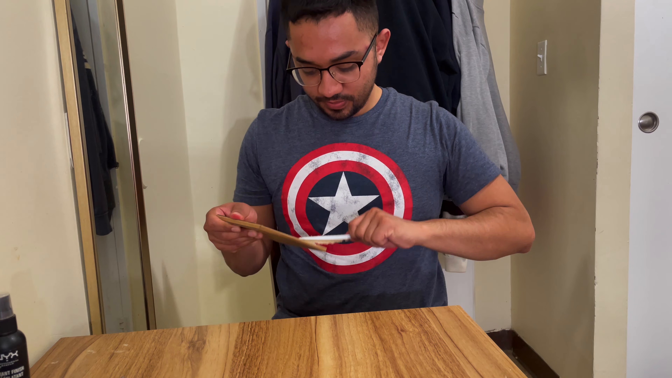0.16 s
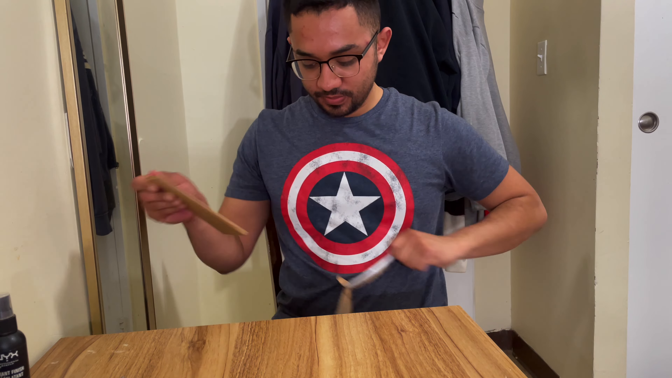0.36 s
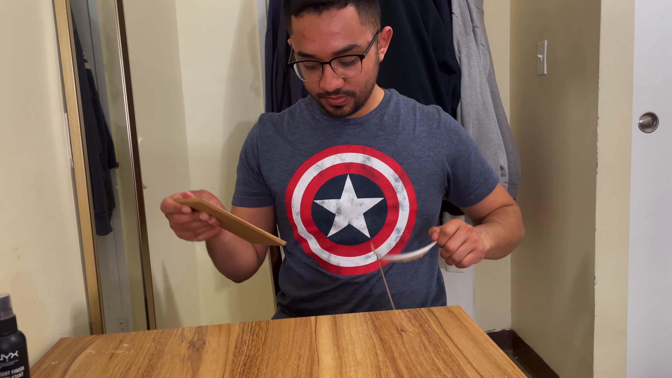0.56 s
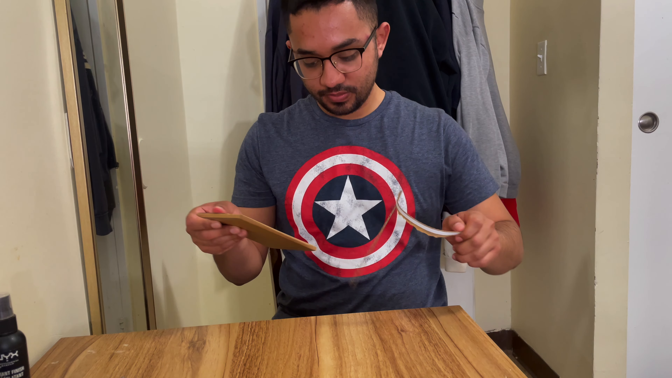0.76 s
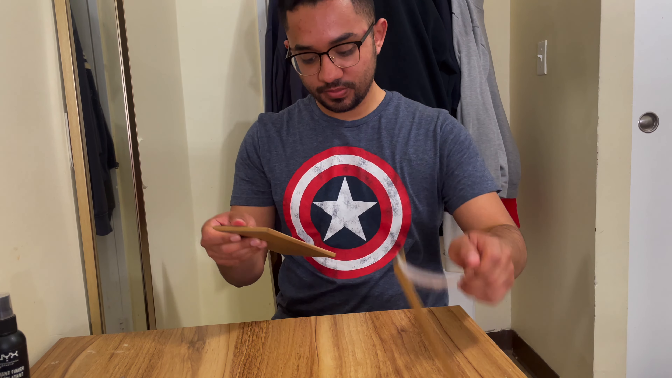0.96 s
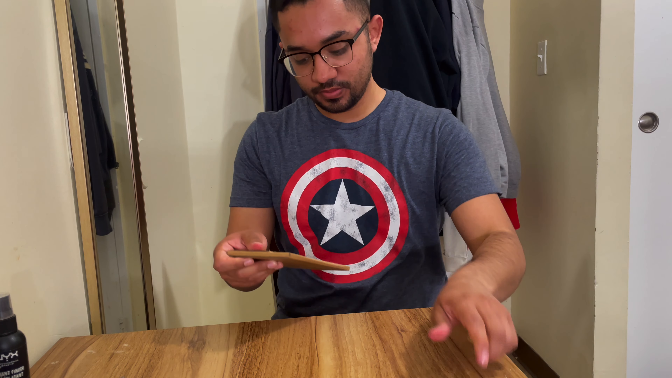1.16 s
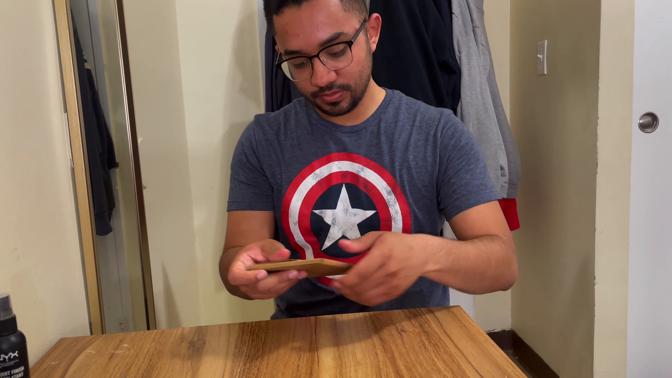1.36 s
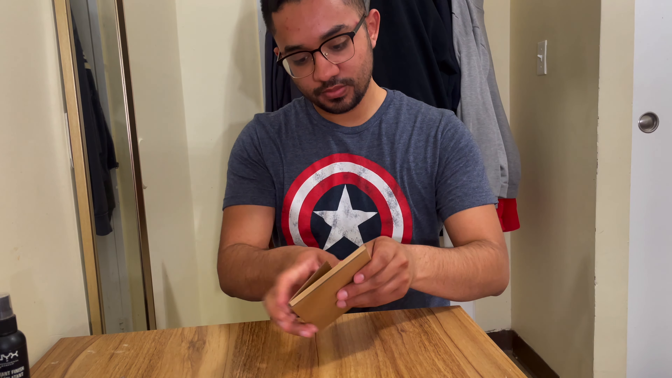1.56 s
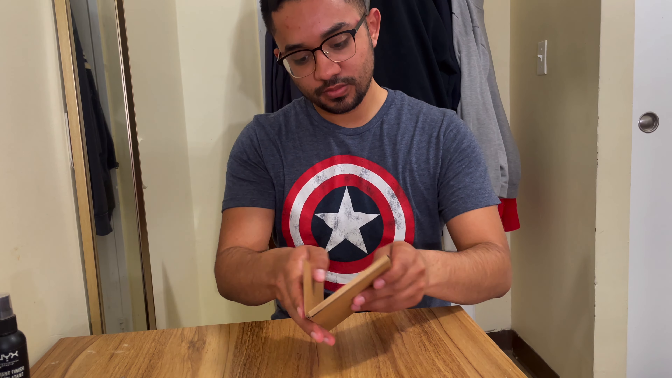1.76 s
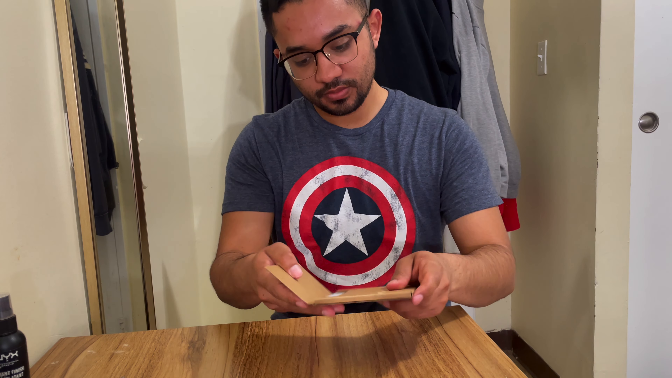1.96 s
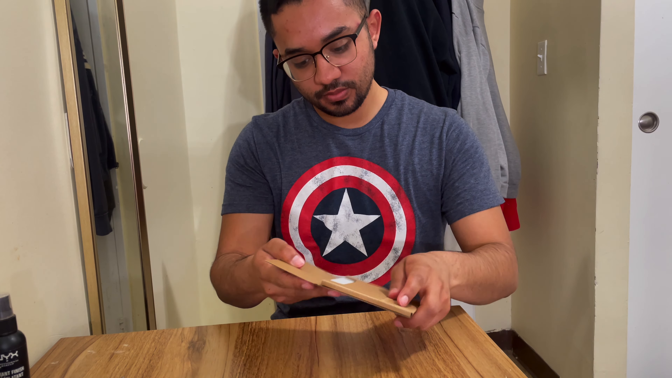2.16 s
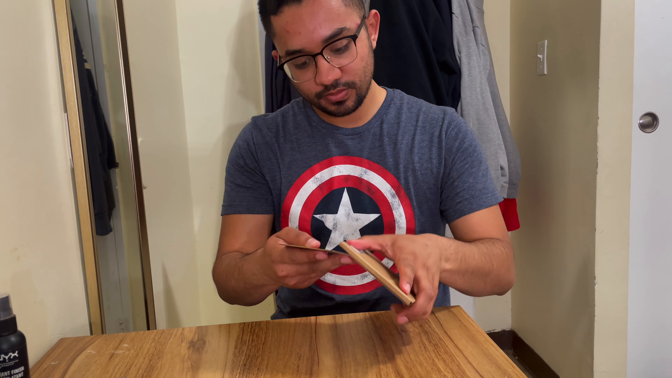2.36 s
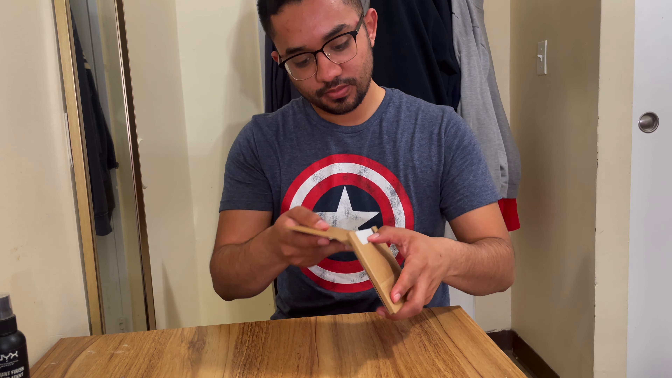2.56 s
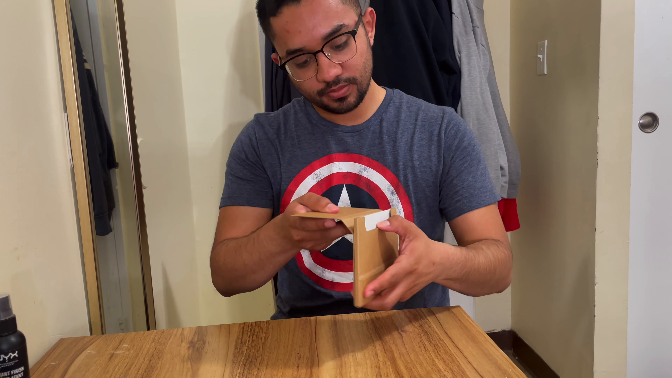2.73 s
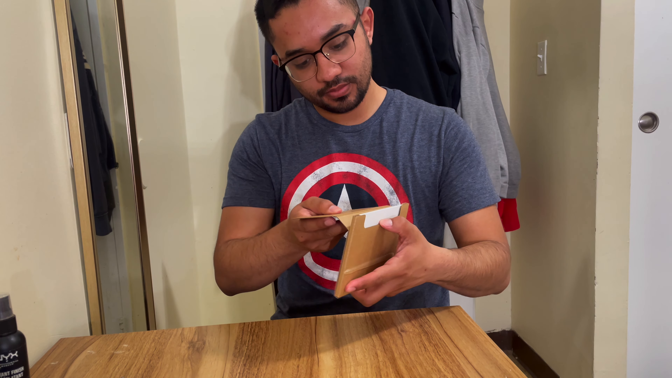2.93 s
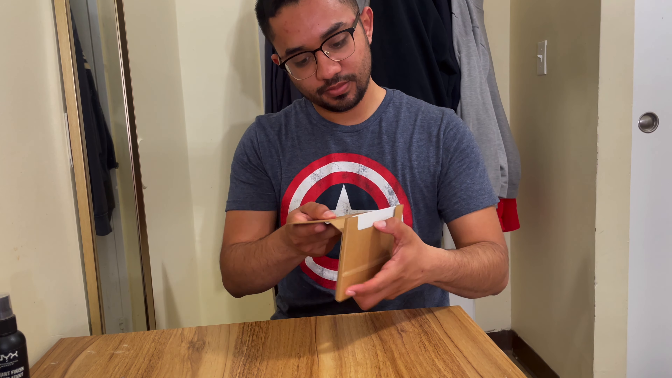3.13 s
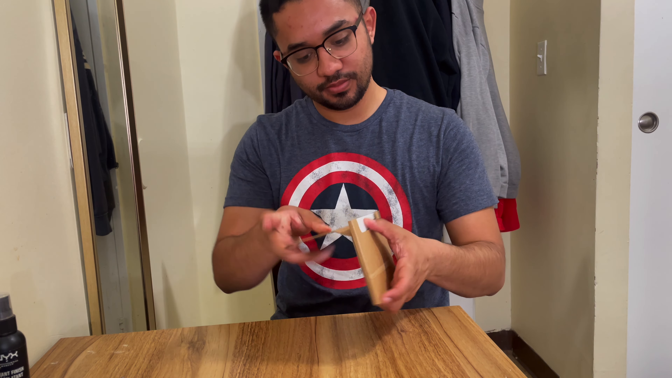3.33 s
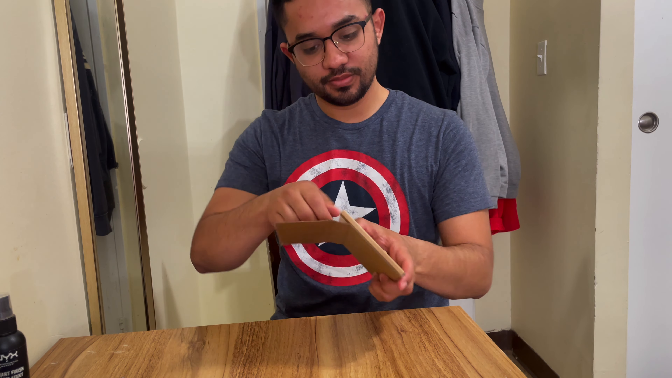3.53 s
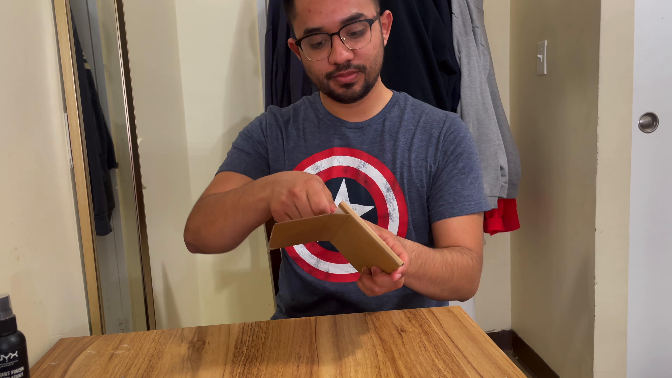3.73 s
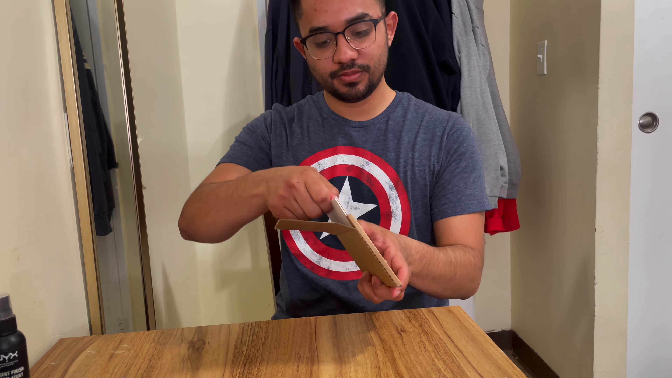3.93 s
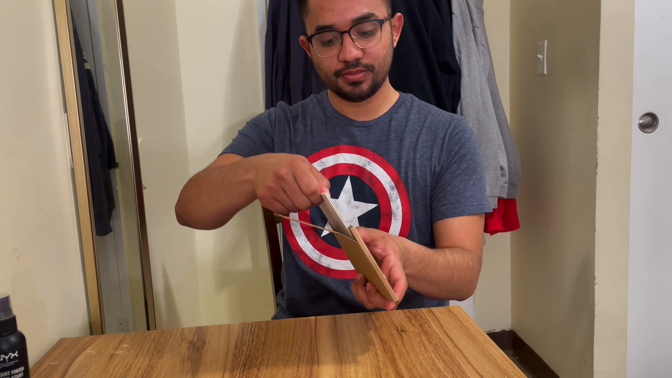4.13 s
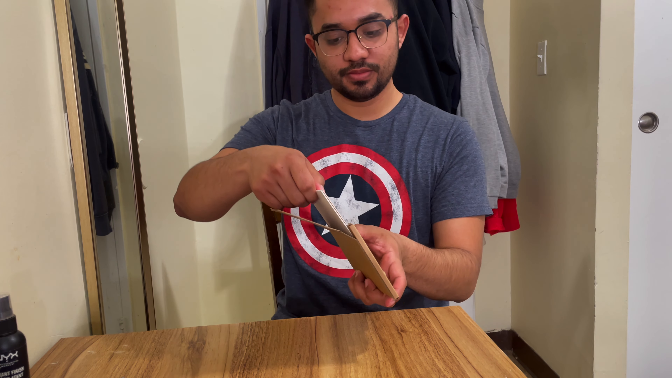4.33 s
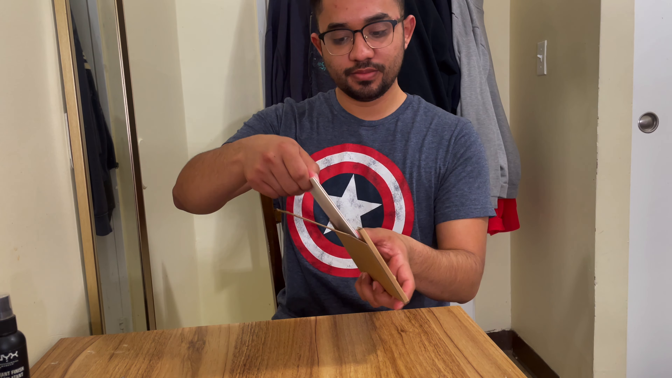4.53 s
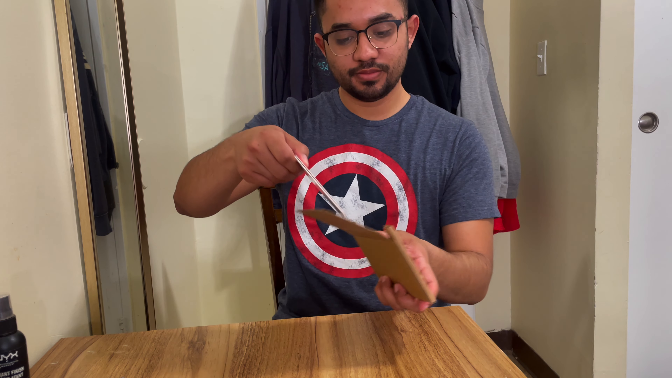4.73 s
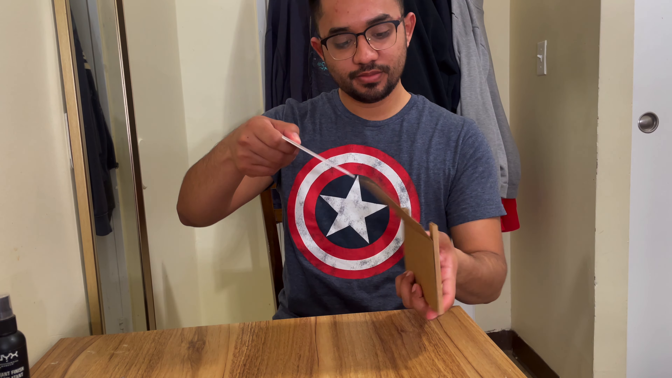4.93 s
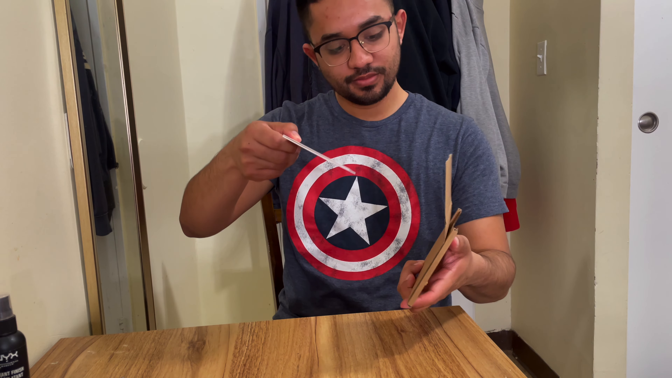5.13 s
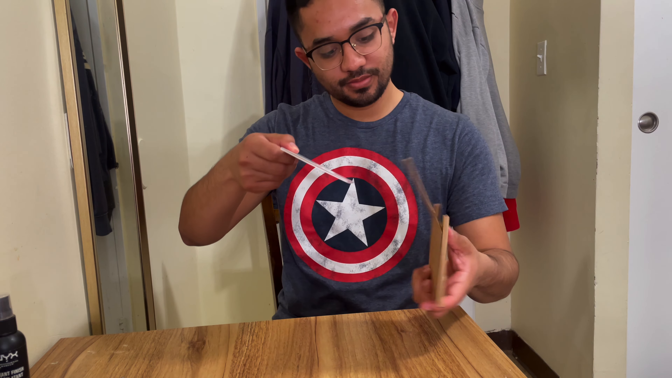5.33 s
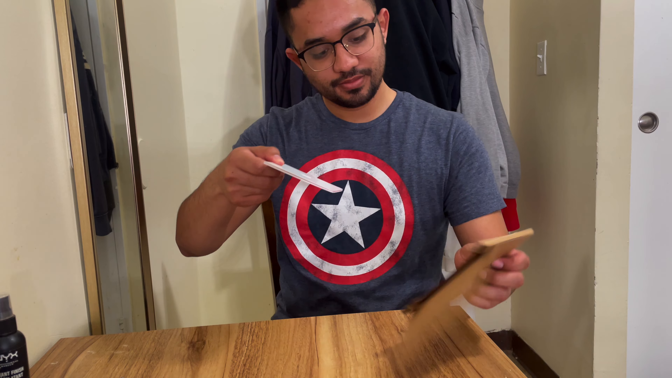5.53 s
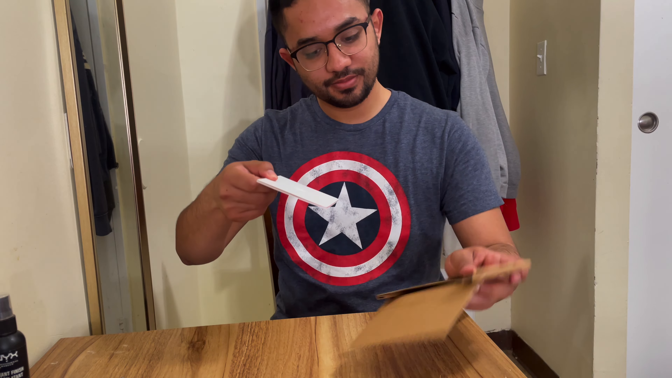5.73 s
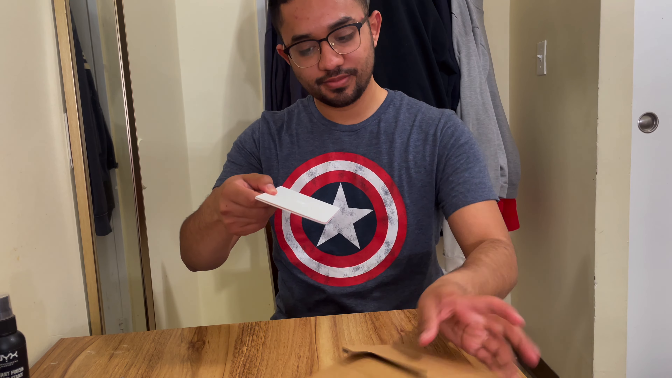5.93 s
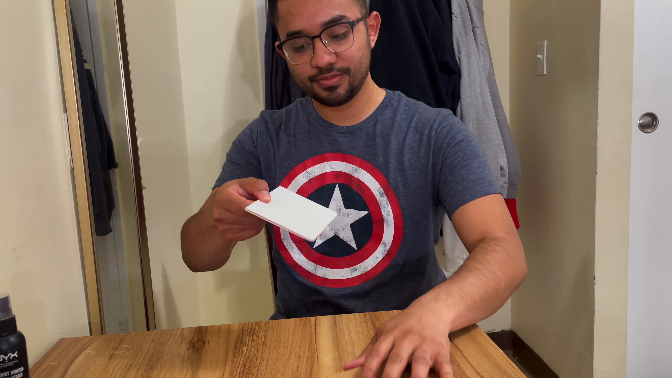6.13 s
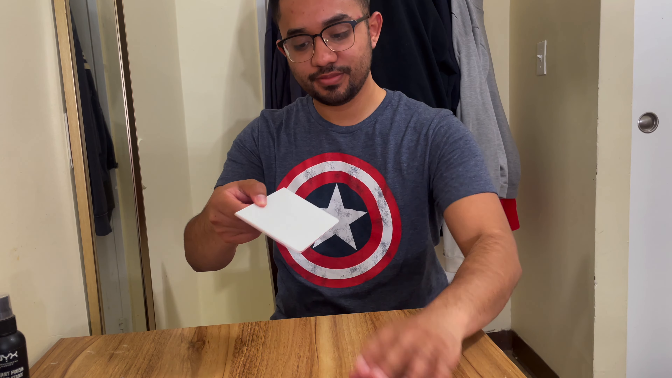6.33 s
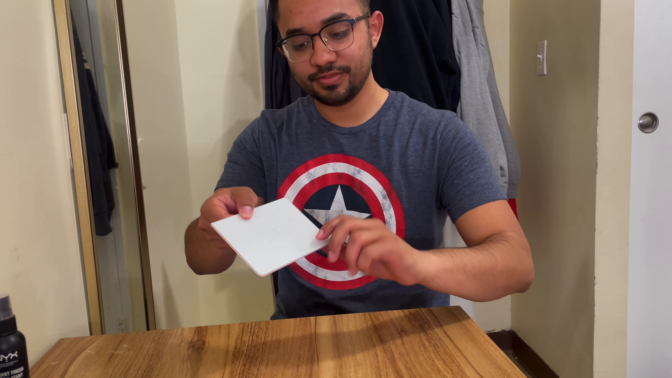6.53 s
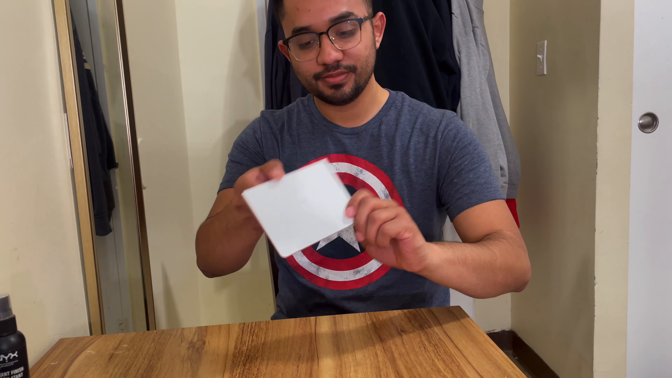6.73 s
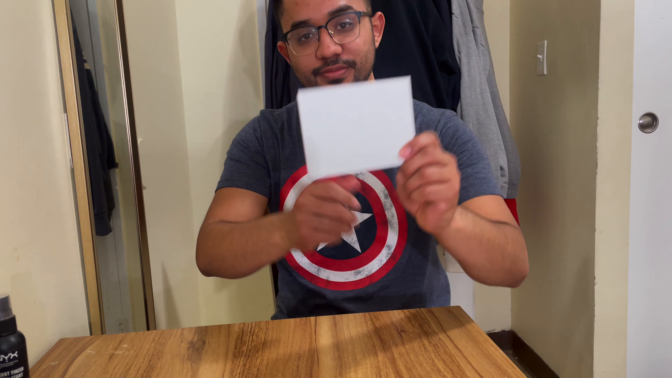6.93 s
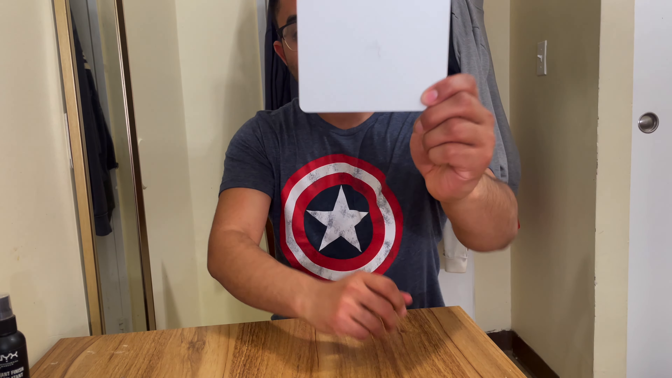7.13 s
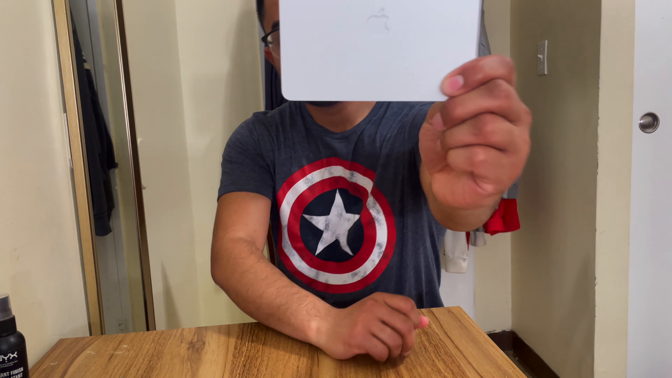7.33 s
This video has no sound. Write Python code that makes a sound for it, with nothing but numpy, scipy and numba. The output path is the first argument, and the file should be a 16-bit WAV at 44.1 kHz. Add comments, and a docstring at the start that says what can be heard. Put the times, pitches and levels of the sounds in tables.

```python
"""A thin cardboard sleeve is torn open and handled: hands rip off its strip, drop it, fumble the flaps,
slide a card out and lay the sleeve on a wooden table. Fibres snap and tear, fingers rub, and both
drive the broad modes of the sheet. Contacts thump the low modes of the table top.
A phone listens in a small room, with the low murmur of the house behind."""
import sys
import numpy as np
from scipy import signal
from scipy.fft import rfft, irfft, next_fast_len
from scipy.io import wavfile
from scipy.ndimage import uniform_filter1d
from numba import njit

SR = 44100
rng = np.random.default_rng(int(sys.argv[2]) if len(sys.argv) > 2 else 0)


def unload_wav(signal):
    """Save mono or channel-first audio to the path in sys.argv[1] as 16-bit WAV at rate SR, clipped to [-1, 1]."""
    wavfile.write(
        sys.argv[1],
        SR,
        np.round(np.clip(np.atleast_2d(signal).T, -1, 1) * 32767).astype(np.int16),
    )


N = 325448


def undb(db):
    """Decibels to gain."""
    return 10 ** (np.asarray(db) / 20)


def unit_rms(x):
    """Scale to rms 1."""
    return x / np.sqrt(np.mean(x ** 2))


def wander(rate_hz):
    """Random steps, smoothed twice; rms 1."""
    hold = int(SR / rate_hz)
    steps = np.repeat(rng.standard_normal(N // hold + 1), hold)
    return unit_rms(uniform_filter1d(uniform_filter1d(steps, hold), hold)[:N])


@njit
def bandpass(x, centre_hz, width_hz):
    """State-variable band-pass, unity gain at a moving centre."""
    y, band, low = np.empty(len(x)), 0., 0.
    for i in range(len(x)):
        g, damping = np.tan(np.pi * centre_hz[i] / SR), width_hz / centre_hz[i]
        v = (band + g * (x[i] + 1e-18 - low)) / (1 + g * (g + damping))
        band, low, y[i] = 2 * v - band, low + 2 * g * v, damping * v
    return y


# Murmur spectrum: freq_hz, relative_density_db
MURMUR_SPECTRUM = [(25, -26.5), (50, -1.5), (100, -2.5), (160, -7), (300, -13.5), (550, -29.5),
                   (1200, -35.5), (3500, -42.5), (8000, -45.5), (15000, -51.5)]
# Murmur envelope: time_s, level_db
MURMUR_LEVELS = [(0, -50.5), (.4, -60), (2.4, -62), (3.3, -60), (4.2, -63), (5.3, -62), (6.3, -55),
                 (7, -64.5), (7.38, -58.5)]


def house_murmur(flicker_db=1.9, side_gain=0.39):
    """Low noise in octave bands that swell together and flicker alone."""
    freq_hz = np.arange(N // 2 + 1) * SR / N + 1
    at_hz, density_db = np.transpose(MURMUR_SPECTRUM)
    colour = undb(np.interp(np.log(freq_hz), np.log(at_hz), density_db))
    mid, side = rfft(rng.standard_normal((2, N))) * colour
    stereo = np.array([mid + side_gain * side, mid - side_gain * side])
    murmur = np.zeros((2, N))
    for octave in range(10):
        band = np.clip(1 - abs(np.log2(freq_hz / 30) - octave), 0, 1)
        murmur += undb(flicker_db * wander(3.4)) * irfft(band * stereo, N)
    level_db = np.interp(np.arange(N) / SR, *np.transpose(MURMUR_LEVELS))
    return unit_rms(murmur) * undb(level_db)


# Room decay: freq_hz, t60_s
ROOM_DECAY = [(150, 0.79), (500, 0.16), (1500, 0.36), (4000, 0.29), (10000, 0.15)]


def echo_tails(count, gap_ms=1.6):
    """Dense stereo echoes, one pattern per hand position; each octave has its own decay."""
    t = np.arange(SR // 2) / SR
    at_hz, t60s = np.transpose(ROOM_DECAY)
    tails = np.zeros((count, 2, len(t)))
    for hz in 180 * 2. ** np.arange(7):
        band = signal.butter(2, [hz / np.sqrt(2), hz * np.sqrt(2)], "band", fs=SR, output="sos")
        t60_s = np.interp(np.log(hz), np.log(at_hz), t60s)
        tails += signal.sosfilt(band, rng.standard_normal(tails.shape)) * 1000. ** (-t / t60_s)
    tails *= t > gap_ms / 1000
    return tails / np.sqrt(np.mean(np.sum(tails ** 2, axis=2)))


def room(direct, wet_db=-6.5):
    """The hands keep moving, so one echo pattern fades into the next every half second."""
    hop = SR // 2
    wet, padded = np.zeros((2, N + 5 * hop)), np.pad(direct, (hop, 2 * hop))
    window = np.sin(np.pi * np.arange(2 * hop) / (2 * hop))
    for k, tail in enumerate(echo_tails(count=N // hop + 2)):
        piece = padded[k * hop:(k + 2) * hop] * window
        wet[:, k * hop:(k + 3) * hop - 1] += signal.fftconvolve(piece[None], tail, axes=1)
    return direct + undb(wet_db) * wet[:, hop:hop + N]


# Pushes on the table top: start_s, level_db, upper_modes_rel_db
TABLE_PUSHES = [(0.034, -25.5, -3), (0.207, -30.5, 7), (0.506, -38, -1.5), (0.602, -42, 1.5),
                (0.966, -32.5, -5), (1.069, -18, -12), (3.467, -46, 8), (3.529, -47, 10.5),
                (4.886, -39.5, 9.5), (5.864, -38.5, -10.5), (5.925, -27.5, -4.5), (5.965, -16, -17),
                (5.991, -25.5, -19), (6.222, -36, -9), (6.459, -53, -18), (7.233, -45, -3)]
# Table top modes, three lower then three upper: pitch_hz, gain_db, t60_s
TABLE_MODES = [(102, -1, .24), (125, -2, .2), (150, 0, .24), (215, 0, .12), (285, 0, .12), (350, -2, .1)]


def table_thumps(contact_ms=1.5, rise_s=0.0031):
    """Half-sine pushes ring the wooden top; little of the thump sounds below its modes."""
    n = int(contact_ms * SR / 1000)
    pulse = np.sin(np.pi * np.arange(n) / n) / n
    pushes = np.zeros((2, N))
    for start_s, level_db, upper_db in TABLE_PUSHES:
        i = int(start_s * SR)
        pushes[:, i:i + n] += np.outer(undb([level_db, level_db + upper_db]), pulse)
    t = np.arange(SR // 2) / SR
    modes = np.array([undb(db) * np.sin(2 * np.pi * hz * t) * 1000. ** (-t / t60_s)
                      for hz, db, t60_s in TABLE_MODES])
    modes *= 1 - np.exp(-t / rise_s)  # the wide top takes a moment to move as a whole
    lower_and_upper = modes.reshape(2, 3, -1).sum(axis=1)
    thumps = signal.fftconvolve(pushes, lower_and_upper, axes=1).sum(axis=0)[:N]
    return signal.sosfilt(signal.butter(4, 85, "high", fs=SR, output="sos"), thumps)


def drive_gains(level_db, board_rel_db, treble_rel_db):
    """Column of gains into the sleeve's four paths: rasp, board, crisp, treble."""
    return undb(level_db + np.array([0, board_rel_db, treble_rel_db / 2, treble_rel_db]))[:, None]


# Finger and card strokes: start_s, swell_s, hold_s, level_db, board_rel_db, treble_rel_db
RUB_STROKES = [(0, 0.00067, 0.037, -29.5, -2.5, -3), (.188, .008, 0.041, -28.5, -9, -6),
               (0.493, 0.011, .002, -55, 10.5, -10), (0.533, 0.035, 0.14, -62.5, 0, -8.5),
               (.965, .005, .03, -43, -13, -14), (1.031, 0.041, 0.068, -48, -2, -14.5),
               (1.354, 0.061, 0.12, -60, -3, -4.5), (1.555, 0.016, 0.014, -55.5, 3.5, -3.5),
               (1.657, 0.036, 0.075, -65, 2.5, -18), (1.769, 0.013, 0.038, -65, 6.5, -8),
               (1.84, 0.064, 0.13, -65, -1, -6), (1.987, 0.011, 0.096, -62, 1, -16.5),
               (2.131, 0.028, 0.1, -61, -0.5, -5), (2.291, 0.013, 0.06, -60, 3.5, -12.5),
               (2.416, 0.017, .07, -66.5, 2.5, -13), (2.506, 0.035, 0.06, -60.5, 2, -25.5),
               (2.563, 0.018, 0.07, -62, -1, -21), (2.642, 0.032, 0.14, -62, -10, -27.5),
               (2.812, 0.068, 0.17, -62.5, 4, -16.5), (3.137, 0.014, 0.17, -50, -3.5, -17),
               (3.28, 0.072, 0.19, -53.5, 2.5, -24), (3.529, 0.048, 0.15, -61.5, -13.5, -20),
               (3.804, .015, .09, -53, -9, -12), (4.01, .05, .06, -57, -14, -14.5),
               (4.32, .07, .1, -59, -9, -18), (4.48, .05, .04, -56, -10, -17),
               (4.756, 0.0091, 0.094, -54, -2, -23.5), (4.815, 0.081, 0.028, -45.5, 0, -20),
               (5.172, 0.0044, 0.035, -71.5, -10, -11.5), (5.216, 0.073, 0.18, -63, -15.5, -14),
               (5.395, 0.093, 0.16, -43.5, -6.5, -25.5), (5.7, 0.084, .06, -62.5, -4, -4.5),
               (5.856, 0.0094, 0.0018, -35.5, -4, -19), (5.923, .012, .02, -37.5, 10, -27),
               (5.951, 0.0067, 0.039, -31, 4, -37), (6.046, 0.092, 0.068, -39, -12.5, -12.5),
               (6.17, 0.058, 0.14, -39.5, -4.5, -19.5), (6.496, .04, 0.061, -77, -5, -20.5),
               (6.706, 0.021, .002, -66.5, 1.5, -11), (7.14, 0.081, .1, -67, -1, -14.5)]


def stroke_envelopes(swell_db=18.5, rasp_db_per_s=209.5, board_db_per_s=216.5, treble_db_per_s=258.5):
    """Strokes swell, hold and fade, treble fastest; overlaps add in power."""
    t, power = np.arange(N) / SR, np.zeros((4, N))
    crisp_db_per_s = (rasp_db_per_s + treble_db_per_s) / 2
    fade_db_per_s = np.vstack([rasp_db_per_s, board_db_per_s, crisp_db_per_s, treble_db_per_s])
    for start_s, swell_s, hold_s, *levels_db in RUB_STROKES:
        span = slice(int(start_s * SR), int(start_s * SR) + SR // 2)
        age_s = t[span] - start_s
        rise_db = -swell_db * np.clip(1 - age_s / swell_s, 0, 1)
        fall_db = -fade_db_per_s * np.clip(age_s - swell_s - hold_s, 0, None)
        power[:, span] += (drive_gains(*levels_db) * undb(rise_db + fall_db)) ** 2
    return np.sqrt(power)


def rubbing(grit_db=1.5, flicker_db=2.5, grip_db=1.5):
    """Friction: thousands of tiny catches a second, some larger, in uneven swells."""
    grip = np.array([wander(11), wander(18)])[[0, 1, 0, 0]]  # the board path is pressed separately
    catches = rng.standard_normal((4, N))
    size_db = grit_db * rng.exponential(size=N) + flicker_db * wander(40) + grip_db * grip
    return unit_rms(catches * undb(size_db)) * stroke_envelopes()


# Crease pops and edge taps: start_s, level_db, ring_hz, board_rel_db, treble_rel_db
CREASE_SNAPS = [(0.0044, -24, 940, -12, -13), (0.0403, -19, 1760, -12, -20),
                (0.192, -19.5, 3830, -6.5, -40), (0.2211, -14, 1342, -13, -2), (0.503, -27, 667, -2, -17),
                (0.577, -40, 660, -2.5, -24), (0.706, -45, 1082, -17, -10), (0.8056, -44.5, 2480, -26, -38),
                (0.9669, -18, 3720, -9, -4.5), (1.044, -25, 1296, 0.5, -13), (1.0666, -20, 1370, -3, -46),
                (1.0804, -21.5, 1000, -11, -19), (1.1147, -22, 3800, -14, -22),
                (1.5615, -31.5, 705, -9, -23), (2.346, -44.5, 601, 4, -26), (2.4349, -47, 619, -0.5, -6.5),
                (2.818, -42.5, 3580, -18, -36.5), (2.9, -45.5, 700, 3, -14), (2.9227, -42.5, 628, 0, -17),
                (3.015, -42, 1060, 1.5, -29), (3.0481, -46.5, 720, 9, -25), (3.1395, -39.5, 990, 3, -40),
                (3.1529, -37.5, 1148, 2, -29), (3.216, -46.5, 982, 6.5, -5), (3.4665, -26, 700, -4, -18),
                (3.531, -38, 2740, -10, -22), (3.818, -35.5, 798, -13.5, -35),
                (4.7594, -41, 2464, 0, -29.5), (4.8637, -43, 1750, -24, -7), (4.8702, -41.5, 656, -15, 5.5),
                (4.937, -27, 2460, -26, -32), (5.8613, -19.5, 1190, -10.5, -27),
                (5.9264, -16.5, 700, 13, -40), (5.945, -23, 2416, -8.5, -20), (5.9587, 0, 772, -5.5, -24.5),
                (5.9868, -7, 664, -6.5, -37), (6.0746, -22, 2464, -14, -49), (6.2194, -26, 1058, 4.5, -22),
                (6.331, -19, 2570, -14.5, -29.5), (6.712, -54.5, 2190, -10.5, -21),
                (7.222, -47, 1192, -15.5, -35.5)]
# Fibre tears and scrapes: start_s, level_db, ring_hz, board_rel_db, treble_rel_db, swell_ms
FIBRE_RIPS = [(0.0209, -28, 1134, -14, -22, 6.8), (0.2059, -20, 3730, -7.5, -4.5, 2.4),
              (0.2307, -21.5, 1936, -12.5, -26.5, 3.2), (1.9899, -48, 2530, -34, -38, 7.0),
              (3.2625, -41.5, 2940, -23, -52, 3.4), (3.3177, -40.5, 2600, -11, -47, 12.4),
              (3.3812, -36.5, 1120, -4.5, -68, 7.8), (4.8479, -45, 2650, -3, -26, 7.3),
              (4.8828, -42, 572, -9.5, -28, 3.3), (4.9216, -29.5, 2390, -16.5, -56, 3.5),
              (5.5573, -40, 2210, -14.5, -31.5, 3.2), (5.5944, -37, 2086, -18.5, -35, 6.4),
              (5.7782, -49, 2426, -12, -27.5, 9.5), (6.1368, -29.5, 2557, -15, -38, 5.6),
              (6.3608, -37.5, 2490, -12, -39, 3.2)]


def snaps_and_rips(snap_decay_ms=1.524):
    """A snap starts at once and strikes the board; a rip swells and shakes it throughout."""
    drive, patch_hz = np.zeros((4, N)), np.full(N, 2500.)
    t_ms = np.arange(4096) / SR * 1000
    snaps = [(*row, np.exp(-t_ms / snap_decay_ms), True) for row in CREASE_SNAPS]
    rips = [(*row, t_ms / swell_ms * np.exp(1 - t_ms / swell_ms), False) for *row, swell_ms in FIBRE_RIPS]
    events = sorted(snaps + rips, key=lambda row: row[0])
    for start_s, level_db, ring_hz, board_db, treble_db, envelope, is_snap in events:
        i, size = int(start_s * SR), np.linalg.norm(envelope)
        noise = rng.standard_normal(len(t_ms)) * envelope
        burst = np.tile(noise * size / np.linalg.norm(noise), (4, 1))
        if is_snap:
            burst[1] = size * (t_ms == 0)  # board path: one impulse of equal energy
        drive[:, i:i + len(t_ms)] += drive_gains(level_db, board_db, treble_db) * burst
        patch_hz[i:] = ring_hz
    return drive, uniform_filter1d(patch_hz, size=16)


def flexing_modes(drive, modes, drift, flex_db):
    """Broad modes of a sheet; bending and gripping shift their pitch and level."""
    sound = np.zeros(N)
    for k, (hz, width_hz, db) in enumerate(modes):
        gain = (-1) ** k * undb(db + flex_db * wander(9))
        centre_hz = hz * (1 + drift * wander(3.9))
        sound += gain * bandpass(drive, centre_hz, float(width_hz))
    noise_power = sum(undb(2 * db) * np.pi * width_hz / SR for _, width_hz, db in modes)
    return sound / np.sqrt(noise_power)


# Low, drumming sleeve modes: pitch_hz, width_hz, relative_db
BOARD_MODES = [(352, 210, -4), (539, 170, -2), (664, 91, 2.5), (843, 120, 0.5), (954, 260, -2.5),
               (1308, 250, -8.5)]
# High, rasping sleeve modes: pitch_hz, width_hz, relative_db
RASP_MODES = [(1620, 1000, -3.5), (2190, 958, 3.5), (3136, 1310, -2.5)]


def cardboard_sleeve(patch_db=9, patch_rub_db=-8, crisp_db=7, treble_db=6.5):
    """Bursts and rubs drive one sheet; the patch that gave way last rings at its own pitch."""
    bursts, patch_hz = snaps_and_rips()
    rubs = rubbing()
    rasp_drive, board_drive, crisp_drive, treble_drive = bursts + rubs
    rasp_shake, board_shake = (bursts + undb(patch_rub_db) * rubs)[:2]
    patch_drive = np.where(patch_hz > 1300, rasp_shake, board_shake)
    patch = undb(patch_db) * bandpass(patch_drive, patch_hz, width_hz=280.)
    rasp = flexing_modes(rasp_drive, RASP_MODES, drift=0.034, flex_db=2.5)
    board = flexing_modes(board_drive, BOARD_MODES, drift=0.036, flex_db=4.1)
    crisp = undb(crisp_db) * bandpass(crisp_drive, np.full(N, 5200.), width_hz=3200.)
    highpass = signal.butter(2, 6000, "high", fs=SR, output="sos")
    fine_fibres = undb(treble_db) * signal.sosfilt(highpass, treble_drive)
    return rasp + board + patch + crisp + fine_fibres


def scene():
    """Cardboard in the room, the table top under the phone, the house behind."""
    return room(cardboard_sleeve()) + table_thumps() + house_murmur()


# The phone's two microphone ports: freq_hz, left_lead_rad, side_gain_db, left_minus_right_db
PHONE_PORTS = [(150, 0, -10, 1.5), (300, .1, 3, 1), (1000, .3, 1.5, 0), (2000, .1, 1.5, 2.1),
               (3000, .7, 1.5, 2.1), (4100, .2, 3, 3), (5300, .4, 3, 2.1), (6200, -.4, 3, 1),
               (7000, -1.3, 3, 0), (7700, -3.14, -30, 0), (8700, -3.14, -30, 0), (9500, -4.8, 3, 0),
               (10700, -6.28, -30, 0), (12600, -6.28, -30, 0), (13300, -7.8, 3, 0), (14200, -9.42, -35, 0)]


def record(dry, ceiling=.9, cutoff_hz=15700):
    """The phone sets width, phase and balance by frequency, rounds peaks and cuts the top."""
    n = next_fast_len(N + 4096)
    freq_hz = np.arange(n // 2 + 1) * SR / n
    at_hz, *columns = np.transpose(PHONE_PORTS)
    lead_rad, side_db, lean_db = (np.interp(freq_hz, at_hz, column) for column in columns)
    left, right = rfft(dry, n)
    mid, side = (left + right) / 2, (left - right) / 2 * undb(side_db)
    skew = np.exp(.5j * lead_rad) * undb(lean_db / 2)
    ports = irfft(np.array([(mid + side) * skew, (mid - side) / skew]), n)[:, :N]
    lowpass = signal.ellip(10, .2, 80, cutoff_hz, fs=SR, output="sos")
    return signal.sosfilt(lowpass, ceiling * np.tanh(ports / ceiling))


dry = scene()
out = record(dry)
unload_wav(out)
```